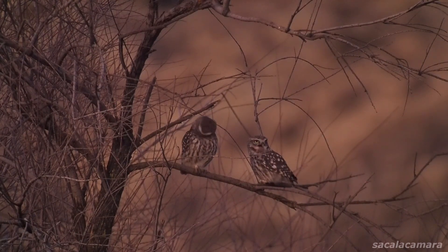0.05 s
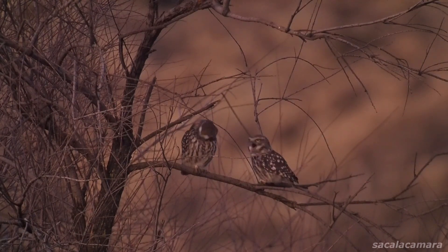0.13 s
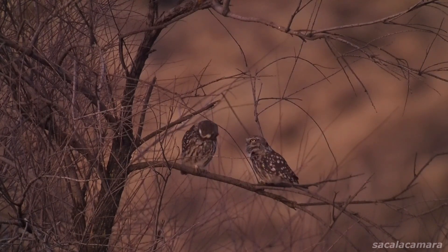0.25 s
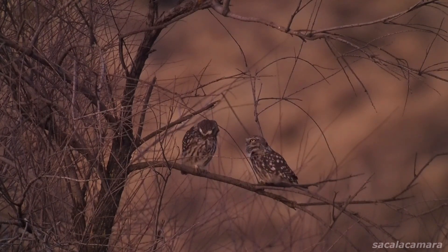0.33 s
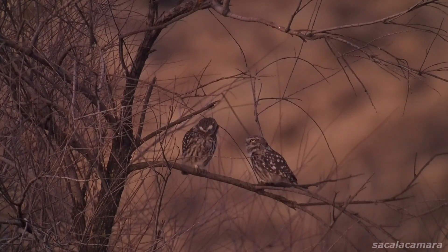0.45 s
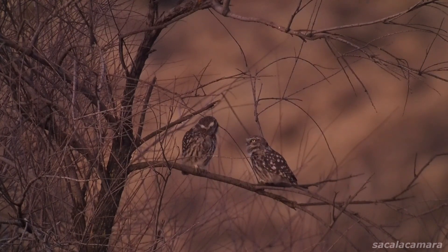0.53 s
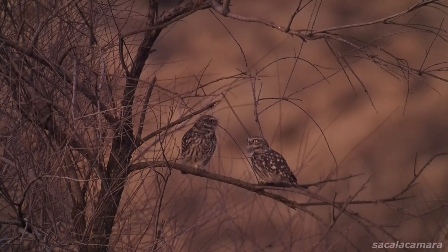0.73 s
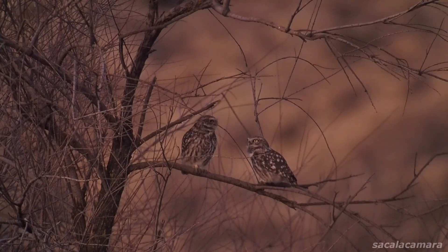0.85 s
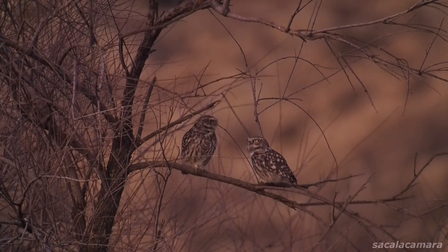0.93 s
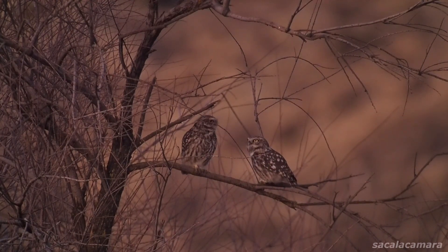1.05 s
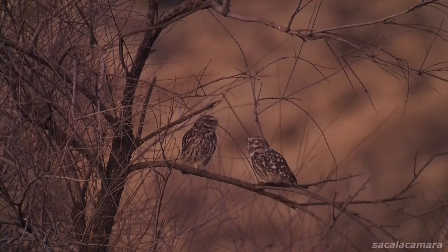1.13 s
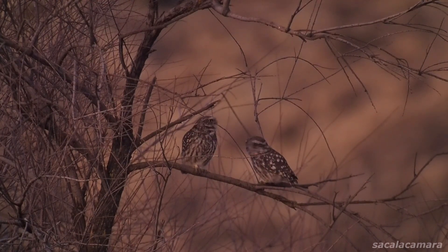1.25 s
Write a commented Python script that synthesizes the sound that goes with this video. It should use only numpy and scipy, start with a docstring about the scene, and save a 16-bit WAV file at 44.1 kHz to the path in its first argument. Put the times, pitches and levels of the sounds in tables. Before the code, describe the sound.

An owl gives one short, arched mew over a steady low rumble and faint hiss.

```python
"""A little owl gives one arched mew from a branch, its second harmonic far the strongest.
Air rushes through the beak; a brief, rough flutter is heard as the call falls. A soft peep comes
just before; a thin, lower whistle leads into the call and sinks with it. Trees and slopes echo it
faintly, over a steady distant rumble, a soft hiss and one far-off note."""
import sys
import numpy as np
from scipy import signal
from scipy.fft import rfft, irfft
from scipy.io import wavfile
from scipy.ndimage import uniform_filter1d

SR = 44100
rng = np.random.default_rng(int(sys.argv[2]) if len(sys.argv) > 2 else 0)


def unload_audio(sound):
    """Save the sound as a 16-bit wav file, at the path given as the first command line argument."""
    columns = np.transpose(np.atleast_2d(sound))
    # keep every value between -1 and 1, then stretch to whole-number steps
    steps = np.round(np.clip(columns, -1, 1) * 32767)
    wavfile.write(sys.argv[1], SR, steps.astype(np.int16))


N = 57330
TIME_S = np.arange(N) / SR


def mew():
    """Arched cry: nine harmonics of one voice, with air rushing through the beak."""
    # (time [s], pitch [Hz])
    pitch = [(.17, 800), (.181, 964), (.194, 1169), (.211, 1310), (.225, 1383), (.25, 1489), (.275, 1489),
             (.31, 1444), (.325, 1407), (.343, 1320), (.359, 1210), (.4, 1097), (.438, 1052), (.465, 860)]
    # fundamental (time [s], level [dB])
    first_level = [(.172, -68), (.197, -46), (.255, -42), (.31, -43.5), (.355, -48.5), (.42, -40),
                   (.443, -50.5), (.462, -67)]
    # second harmonic, swelling as the call opens (time [s], level [dB])
    second_level = [(.168, -64), (.195, -40), (.235, -23), (.268, -18.5), (.295, -21.5), (.321, -23),
                    (.355, -35.5), (.38, -41.5), (.397, -58), (.445, -56), (.475, -75)]
    # third harmonic (time [s], level [dB])
    third_level = [(.172, -74), (.2, -48), (.228, -54.5), (.28, -45.5), (.312, -50.5), (.335, -56.5),
                   (.355, -52.5), (.385, -76)]
    # fourth harmonic, also scaling those above (time [s], level [dB])
    fourth_level = [(.185, -79), (.212, -61.5), (.245, -44), (.305, -40.5), (.322, -51.5), (.338, -40.5),
                    (.356, -56.5), (.385, -57), (.44, -75)]
    # (harmonic, level re fourth at unit effort [dB], growth with effort [dB/dB, sign ignored])
    overtones = [(5, -8, 1), (6, -26.5, -2.5), (7, -41, -1), (8, -32.5, 1.5), (9, -23, -2.5)]
    # beak air (frequency [Hz], relative density [dB])
    air_spectrum = [(1500, -22.5), (2500, -24.5), (3050, -11.5), (3650, 1.5), (4100, -22), (5500, -16.5),
                    (7500, -22), (10500, -27), (13000, -23), (15500, -31.5)]
    flutter_hz, flutter_bend, flutter_depth = 150, .012, .45
    shimmer_hz, unit_effort_db = 130, -21

    # a brief, rough flutter is heard as the call falls
    flutter_phase = integrate_phase(flutter_hz * (1 + .2 * walk(40)))
    flutter = swell(centre_s=.356, width_s=.015) * np.sin(flutter_phase)
    pitch_hz = curve(pitch)
    phase = jittered_phase(pitch_hz) + integrate_phase(pitch_hz * flutter_bend * flutter)

    def harmonic(k, shimmer_db=1.0):
        return undb(shimmer_db * walk(shimmer_hz)) * np.sin(k * phase)

    first = envelope(first_level) * np.sin(phase)
    second_gain = envelope(second_level)
    airy_second = second_gain * (harmonic(2, shimmer_db=.15) + undb(-30) * noise(air_spectrum))
    third = envelope(third_level) * harmonic(3)
    fourth = harmonic(4)
    effort = np.abs(second_gain) / undb(unit_effort_db)
    upper = sum(undb(db) * effort ** abs(growth) * harmonic(round(k)) for k, db, growth in overtones)
    treble = envelope(fourth_level) * (fourth + upper)
    return first + (airy_second + third + treble) * (1 + flutter_depth * flutter)


def whistle(rows):
    """Thin pure tone from (time [s], pitch [Hz], level [dB]) rows."""
    return envelope(rows, axis=2) * np.sin(jittered_phase(curve(rows)))


def owl():
    """Whistle and peep lead into the mew; a brief side tone sounds above its second harmonic."""
    # (time [s], pitch [Hz], level [dB])
    low_whistle = [(0, 835, -46.5), (.085, 845.4, -43), (.15, 855, -46.5), (.225, 853, -50),
                   (.285, 829.4, -43), (.318, 779, -59.5), (.345, 728, -46), (.378, 645, -54),
                   (.405, 596, -50), (.45, 498, -64)]
    # (time [s], pitch [Hz], level [dB])
    peep = [(.105, 1155, -67.5), (.143, 1111, -42), (.165, 1088, -53), (.19, 1075, -59.5)]
    side_gain = undb(-49) * swell(centre_s=.306, width_s=.014)
    side_tone = side_gain * np.sin(jittered_phase(hz=np.full(N, 3625.)))
    return mew() + whistle(low_whistle) + whistle(peep) + side_tone


def outdoors(x):
    """Direct sound, tree echoes, branch scatter, a late blur from a slope and a wash from the hills."""
    # nearby trees (delay [s], level [dB])
    reflections = [(.07, -46), (0.136, -46.5)]
    trees = sum(undb(db) * delayed(x, delay_s) for delay_s, db in reflections)
    slope = diffuse_echo(delayed(x, delay_s=.41), db=-40, t60_s=1.8)
    hills = diffuse_echo(x, db=-37.5, t60_s=3.0)
    branches = diffuse_echo(x, db=-35, t60_s=.3)
    return x + trees + branches + slope + hills


def diffuse_echo(x, db, t60_s):
    """Scattered sound: a decaying noise response, different in each ear."""
    onset = 1 - np.exp(-TIME_S / .015)
    response = rng.standard_normal((2, N)) * undb(-60 * TIME_S / t60_s) * onset
    response /= np.sqrt((response ** 2).sum(axis=1, keepdims=True))
    return undb(db) * signal.fftconvolve(x[None], response, axes=1)[:, :N]


def far_note():
    """One faint, rising, far-off note."""
    # (time [s], pitch [Hz], level [dB])
    note = [(.99, 675, -62), (1.035, 707, -53.5), (1.07, 726, -68)]
    return whistle(note)


def rumble():
    """Distant low noise, its level wavering slightly."""
    # (frequency [Hz], relative density [dB])
    spectrum = [(20, -8.5), (38, -15.5), (68, -1), (125, -2), (210, -3.5), (330, -11.5), (520, -8),
                (800, -10.5), (1150, -10.5), (1600, -26.5), (2500, -41.5)]
    return stereo_noise(spectrum, db=-51.5, side_db=-6, pan_db=1.0) * undb(.56 * walk(hz=6))


def hiss():
    """Soft, wide, steady hiss."""
    # (frequency [Hz], relative density [dB])
    spectrum = [(800, -1.5), (2000, 0), (3000, -0.5), (5600, -1.5), (6500, -12), (7400, -7), (9200, -7),
                (10400, -21.5), (12500, -10.5), (15500, -9.5)]
    return stereo_noise(spectrum, db=-60.5, side_db=1, pan_db=-.5)


def stereo_noise(spectrum, db, side_db, pan_db):
    """Mid plus side noise; pan_db is left over right."""
    balance = undb(np.array([[pan_db], [-pan_db]]) / 2)
    mid = noise(spectrum)
    side = undb(side_db) * noise(spectrum) * np.array([[1], [-1]])
    return undb(db) * balance * (mid + side)


def noise(spectrum):
    """Unit-RMS noise from (frequency [Hz], relative density [dB]) rows."""
    hz, db = np.array(spectrum).T
    bins_hz = np.fft.rfftfreq(N, 1 / SR)
    gain = undb(np.interp(np.log(bins_hz + 1), np.log(hz), db))
    shaped = irfft(rfft(rng.standard_normal(N)) * gain, N)
    return shaped / shaped.std()


def walk(hz):
    """Unit-RMS random drift, low-passed at hz."""
    rolloff = 1 + (np.fft.rfftfreq(N, 1 / SR) / hz) ** 4
    drift = irfft(rfft(rng.standard_normal(N)) / rolloff, N)
    return drift / drift.std()


def jittered_phase(hz, jitter=.0025):
    """Phase [rad] of a smoothed, slightly unsteady pitch."""
    return integrate_phase(uniform_filter1d(hz, size=400) * (1 + jitter * walk(hz=260)))


def integrate_phase(hz):
    return 2 * np.pi * np.cumsum(hz) / SR


def envelope(rows, axis=1):
    """Gain from a dB column, silent outside its span."""
    gate = 1. * ((TIME_S >= rows[0][0]) & (TIME_S <= rows[-1][0]))
    return undb(curve(rows, axis)) * uniform_filter1d(gate, size=200)


def curve(rows, axis=1):
    """One column, linearly interpolated in time."""
    rows = np.array(rows)
    return np.interp(TIME_S, rows[:, 0], rows[:, axis])


def swell(centre_s, width_s):
    return np.exp(-((TIME_S - centre_s) / width_s) ** 2)


def delayed(x, delay_s):
    return np.interp(TIME_S - delay_s, TIME_S, x, left=0)


def undb(db):
    return 10 ** (np.asarray(db) / 20)


def scene():
    """The owl, straight ahead, over rumble, hiss and one far-off note."""
    return rumble() + hiss() + outdoors(owl()) + far_note()


def record(dry):
    """Steep low-pass."""
    cutoff_hz = 15730
    return signal.sosfilt(signal.ellip(10, .1, 80, cutoff_hz, fs=SR, output="sos"), dry)


dry = scene()
out = record(dry)
unload_audio(out)
```